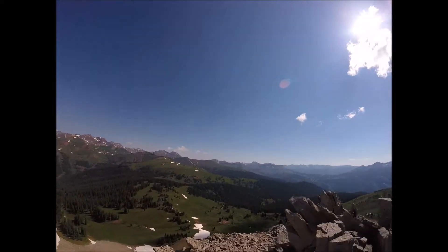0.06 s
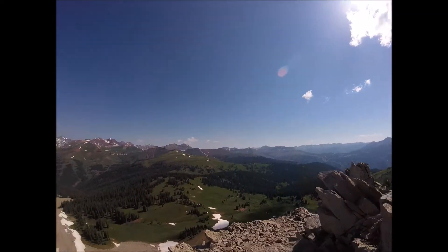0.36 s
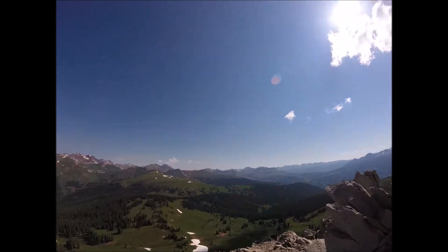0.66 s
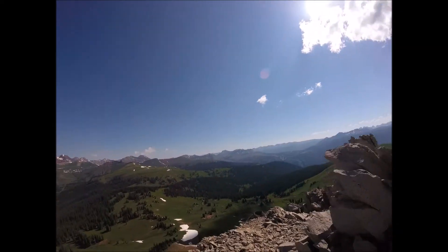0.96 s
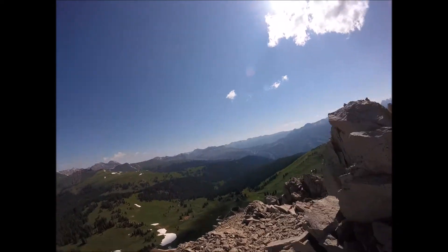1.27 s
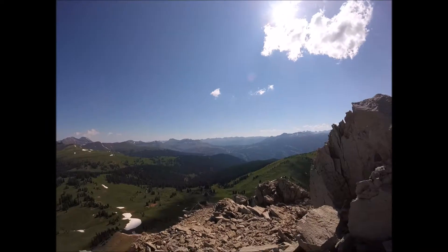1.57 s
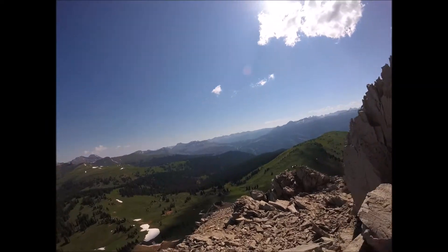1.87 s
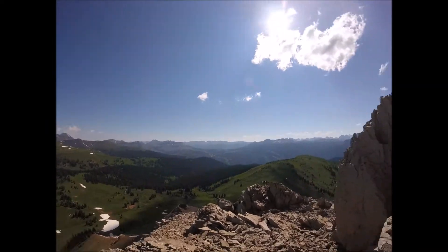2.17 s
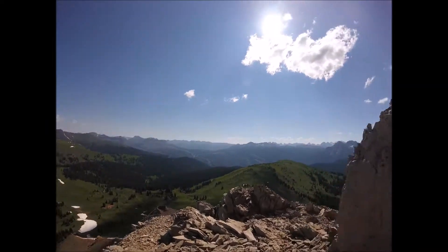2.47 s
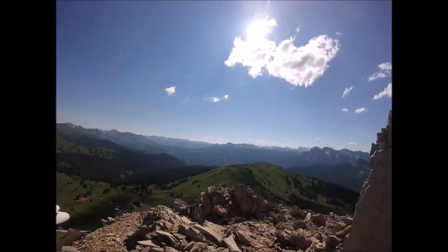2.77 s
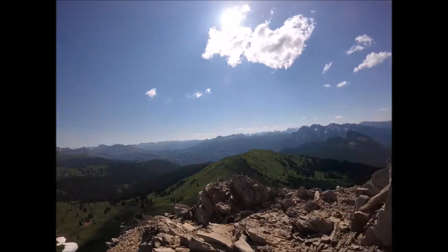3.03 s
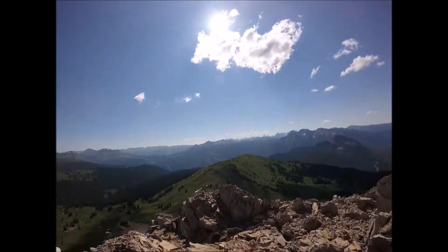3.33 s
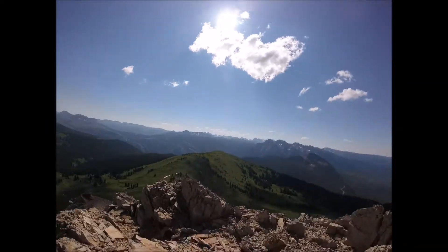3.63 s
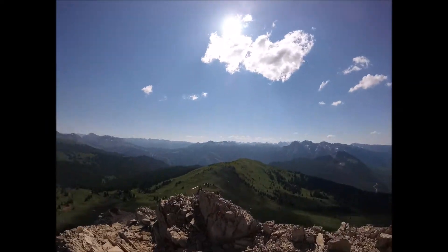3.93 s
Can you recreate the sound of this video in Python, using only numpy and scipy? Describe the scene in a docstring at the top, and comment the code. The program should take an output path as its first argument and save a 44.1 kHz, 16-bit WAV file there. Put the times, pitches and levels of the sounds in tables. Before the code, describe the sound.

Boots grind through gravel and knock flat stones together on a windy ridge. Gusts hit the close microphone through the first half, then ease, leaving the uneven steps, a low rumble and a few dull bumps.

```python
"""Wind buffets a body-worn camera's microphone as boots crunch over flat stones on a mountain ridge.
Each step grinds the loose gravel by friction, knocks stones together and sets thin shards ringing
in damped modes; scree keeps settling in between. The turbulent gusts then drop to a slow, deep
rumble, while footfalls and handling jolt the camera with soft thumps."""
import sys
import numpy as np
from scipy import signal
from scipy.fft import rfft, irfft, next_fast_len
from scipy.io import wavfile
from scipy.ndimage import uniform_filter1d, minimum_filter1d, map_coordinates

SR = 44100
rng = np.random.default_rng(int(sys.argv[2]) if len(sys.argv) > 2 else 0)


def transcribe(u):
    """Save the signal u as a 16-bit wav file named by the first command-line argument.

    u: samples, shape (n,) or (channels, n), limited to [-1, 1]; the rate is SR.
    q: integer samples, one column per channel.
    """
    v = np.clip(np.atleast_2d(u).T, -1, 1)
    q = np.round(v * 32767).astype(np.int16)
    wavfile.write(sys.argv[1], SR, q)


N = 176400

# spectrum of stone touching stone: (frequency [Hz], relative density [dB])
STONE_SPECTRUM = [(150, -35.5), (250, -7.5), (457, 2), (700, -2), (899, 1.5), (1300, 0.5), (2020, -2),
                  (3920, -10.5), (4410, -14.5), (5660, -18), (7710, -24), (8420, -31), (10900, -45),
                  (14000, -59.5), (18500, -120)]


def crunches():
    """Stick-slip friction: the boot's weight builds up, grinds the gravel in fits and lets go."""
    # (time [s], rise [s], hold [s], release t60 [s], level [dB], bass [dB], treble [dB])
    steps = [(0.326, 0.021, 0.0077, 0.087, -27.5, -5.5, 9), (0.365, 0.042, 0.022, 0.08, -40, -21, 4),
             (0.668, 0.026, 0.019, 0.087, -29, 7.5, 10.5), (0.777, 0.015, 0.012, 0.077, -32.5, 17.5, 10),
             (0.86, 0.0094, 0.009, 0.18, -30.5, 12, 6.5), (1.019, 0.022, 0.0081, 0.14, -22, 13.5, 11.5),
             (1.064, 0.023, 0.17, 0.3, -39, 19, 6.5), (1.361, 0.0089, 0.004, 0.11, -31, 12, 1),
             (1.653, 0.0036, 0.045, .1, -38, -1, 8.5), (1.979, 0.034, 0.026, 0.046, -34.5, -2.5, 5.5),
             (2.082, 0.023, 0.0099, 0.048, -32.5, 7, 6), (2.414, 0.0074, 0.062, 0.16, -44, 9.5, -2.5),
             (2.668, 0.024, 0.011, 0.1, -28.5, 1.5, 5), (2.782, 0.026, 0.016, 0.17, -37.5, 11, 1),
             (2.893, 0.0035, 0.024, 0.35, -41, -8, 10), (2.965, 0.029, 0.032, 0.16, -24, -0.5, 4.5),
             (3.038, 0.033, 0.0028, 0.055, -24.5, 1, 2), (3.351, 0.029, 0.016, 0.16, -24.5, -3, -5.5),
             (3.491, 0.0045, 0.025, 0.1, -39, 3, 12), (3.569, 0.01, 0.0063, 0.089, -31, -10, -10),
             (3.664, 0.0052, 0.033, 0.048, -38.5, -21, -31), (3.809, 0.019, 0.069, 0.043, -39, 4.5, -5)]
    clump_db, clumps_per_s = 2.2, 320
    out, t = np.zeros(N), np.arange(SR // 2) / SR
    for start, rise, hold, t60, db, bass_db, treble_db in steps:
        loading = np.minimum(t / rise, 1) ** 1.21
        release = amp(-60 * np.maximum(t - rise - hold, 0) / t60)
        grinding = shifting(gravel(len(t), bass_db, treble_db))
        fits = amp(clump_db * wobble(clumps_per_s, len(t)))
        add(out, start, amp(db) * loading * release * unit(grinding * fits))
    return out


def gravel(n, bass_db, treble_db):
    """Source and filter: contacts and grinding, coloured by the stones and the camera housing."""
    # resonances of the camera housing, which colour every crunch and knock:
    # (frequency [Hz], bandwidth [Hz], lift [dB])
    housing_modes = [(1287, 36, 4.5), (1530, 30, 5), (1777, 26, 7)]
    bass_hz, treble_hz, grinding_share = 707, 3230, 0.59

    def colour(hz):
        housing = sum(db / (1 + (2 * (hz - centre) / width) ** 2) for centre, width, db in housing_modes)
        bass = bass_db / (1 + (hz / bass_hz) ** 4)
        treble = treble_db * (1 - 1 / (1 + (hz / treble_hz) ** 4))
        return along(STONE_SPECTRUM, hz) + housing + bass + treble + ripple(hz)
    contacts = np.sqrt(1 - grinding_share) * grains(n, per_s=1500, spread_db=5)
    grinding = np.sqrt(grinding_share) * rng.standard_normal(n)
    return coloured(contacts + grinding, colour)


def ripple(hz, depth_db=3, step_hz=170):
    """Irregular modes give each stone its own uneven frequency response, in dB."""
    return depth_db * map_coordinates(rng.standard_normal(size=256), [hz / step_hz], mode="mirror")


def shifting(x, depth_db=2.4):
    """Time-varying filtering: brief resonances come and go as other stones take the load."""
    spectrogram = signal.stft(x, nperseg=256)[2]
    patches = uniform_filter1d(rng.standard_normal(spectrogram.shape), 4, axis=0)  # across frequency
    patches = uniform_filter1d(patches, 3, axis=1)  # across time
    shifted = signal.istft(spectrogram * amp(depth_db * unit(patches)))[1]
    return unit(shifted[:len(x)])


def knocks():
    """Impact excitation: a stone tips onto another with a dry, broadband clack."""
    # (time [s], level [dB], t60 [s], treble [dB])
    impacts = [(0.103, -24, 0.059, 2), (0.34, -32, 0.047, 23), (0.412, -31.5, 0.034, 5),
               (0.628, -35, 0.11, 5), (0.68, -29.5, 0.059, 8.5), (.761, -32, 0.073, 0.5),
               (0.794, -24, 0.022, -13), (1.015, -35, 0.056, 11), (1.139, -23, 0.038, 4),
               (1.196, -15.5, 0.051, 12), (1.342, -25.5, 0.038, 12), (1.354, -26, 0.086, 8),
               (1.552, -33, 0.042, -5.5), (1.66, -36, .05, 15), (1.69, -29.5, 0.073, 3),
               (1.843, -36.5, 0.046, -5), (2.084, -34.5, 0.074, 10), (2.686, -20.5, 0.052, 17),
               (2.768, -35.5, 0.031, 16), (2.804, -28, 0.04, -30), (2.905, -23.5, 0.026, -7),
               (2.985, -20, 0.023, 8), (3.005, -15, 0.032, 5), (3.018, -15.5, 0.03, 17),
               (3.063, -17.5, 0.041, 10), (3.378, -13, 0.037, 14.5), (3.668, -24, 0.055, -1),
               (3.673, -31.5, 0.033, 14.5), (3.724, -27, 0.045, -6), (3.747, -37.5, 0.085, 6),
               (3.783, -29, 0.11, -8), (3.845, -27, 0.084, 10.5), (3.932, -32, 0.021, 16),
               (3.965, -20.5, 0.058, -1)]
    out, t = np.zeros(N), np.arange(SR // 4) / SR
    for start, db, t60, treble_db in impacts:
        clack = gravel(len(t), bass_db=-1.6, treble_db=treble_db)
        add(out, start, amp(db) * struck(t, t60, attack_s=0.0013) * clack)
    return out


def clinks():
    """Free vibration: struck flat stones ring briefly at their natural frequencies."""
    # (time [s], frequency [Hz], level [dB], t60 [s])
    shards = [(0.338, 4460, -16.5, 0.024), (.63, 3560, -31.5, 0.029), (0.868, 1242, -24.5, 0.098),
              (1.015, 800, -8, 0.012), (1.661, 6330, -27.5, 0.019), (2.012, 2143, -14.5, 0.034),
              (2.011, 1744, -15.5, 0.03), (2.688, 7250, -28, 0.028), (2.701, 6460, -18, 0.017),
              (2.905, 6770, -33.5, 0.038), (2.973, 6950, -36.5, 0.07), (3.02, 1266, -18.5, 0.082),
              (3.379, 1310, -5, 0.031), (3.377, 1690, -21, 0.032), (3.379, 737, -20, 0.09),
              (3.583, 6420, -27.5, 0.024), (3.804, 6200, -39.5, 0.033), (3.819, 4900, -34, 0.016),
              (3.848, 3840, -29, 0.095), (3.844, 6550, -33.5, 0.029), (3.864, 5510, -26.5, 0.031),
              (3.894, 4660, -37, 0.033), (3.964, 1450, -15, 0.022)]
    out = np.zeros(N)
    for start, hz, db, t60 in shards:
        add(out, start, amp(db) * ring(hz, t60))
    return out


def ring(hz, t60, attack_cycles=1.6, roughness=0.3):
    """One damped mode of a stone, its phase disturbed by rattling on its neighbours."""
    t = np.arange(SR // 5) / SR
    rattle = uniform_filter1d(rng.standard_normal(len(t)), size=12)
    drift = roughness * np.cumsum(rattle) / np.sqrt(SR / 1000)
    attack = (1 - np.exp(-t * hz / attack_cycles)) ** 2
    return np.sin(2 * np.pi * hz * t + drift) * attack * amp(-60 * t / t60)


def scree():
    """Granular flow: disturbed gravel trickles in clumps; chips stand out more when much of it moves."""
    # (time [s], relative level [dB])
    activity = [(0, -43), (.2, -44.5), (.3, -55.5), (.42, -35.5), (.52, -47), (.75, -44), (.95, -46.5),
                (1, -56), (1.2, -48), (1.32, -48), (1.42, -43), (1.62, -52.5), (1.72, -40.5), (1.84, -49.5),
                (1.9, -42), (2.02, -44), (2.36, -54), (2.65, -50.5), (2.73, -42.5), (2.87, -41),
                (3.18, -36.5), (3.34, -49.5), (3.43, -47.5), (3.52, -40), (3.63, -44), (4, -40.5)]
    # (frequency [Hz], relative density [dB])
    trickle_spectrum = [(180, -59.5), (300, -21), (437, -7), (600, -11.5), (1390, -9), (4560, -28.5),
                        (7120, -33), (8420, -45.5), (10900, -60), (18500, -120)]
    level_db = curve(activity)
    contacts = grains(N, per_s=2800, spread_db=0)
    trickle = coloured(contacts, lambda hz: along(trickle_spectrum, hz)) * amp(3.5 * wobble(70))
    chips = chip_ticks(count=130, centre_hz=3100, spread_octaves=0.65, spread_db=2.1, t60=0.04)
    chips_db = -11.5 + 0.19 * (level_db - level_db.max())
    return amp(level_db) * (amp(-5.5) * trickle + amp(chips_db) * chips)


def chip_ticks(count, centre_hz, spread_octaves, spread_db, t60):
    """Random impacts: each small chip ticks in its own resonant band; rms 1 overall."""
    out, t = np.zeros(N), np.arange(SR // 16) / SR
    envelope = struck(t, t60, attack_s=0.0016)
    starts = rng.random(count) * N / SR
    for start, (pitch, size) in zip(starts, np.clip(rng.standard_normal((count, 2)), -2, 2)):
        def band(hz):
            octaves_off = np.log2((hz + 1) / centre_hz) - spread_octaves * pitch
            return along(STONE_SPECTRUM, hz) - 9 * octaves_off ** 2 + ripple(hz)
        add(out, start, amp(spread_db * size) * envelope * coloured(rng.standard_normal(len(t)), band))
    return unit(out)


def wind():
    """Turbulence: gusts buffet the microphone over a faint hiss; strong ones shed brighter eddies."""
    # (time [s], relative level [dB])
    gusts = [(0, -25.5), (.3, -32.5), (.6, -28), (1.1, -31), (1.3, -34), (1.7, -39.5), (2.3, -49),
             (2.7, -42), (4, -43.5)]
    # sudden blasts: (centre time [s], duration [s], lift [dB], extra eddy level [dB])
    blasts = [(0.182, 0.036, 11.5, 3.5), (0.271, 0.041, 13.5, -1.5), (0.351, 0.029, 8, 10),
              (0.481, 0.16, 9.5, -1.5), (0.685, 0.11, 4, 3.5), (0.822, 0.17, 9.5, 0), (1.037, 0.038, 10, 1),
              (1.142, 0.18, 11, 5.5), (1.359, 0.068, 10, 6), (1.521, 0.12, 8.5, 3),
              (1.64, 0.032, 11.5, 6.5), (1.783, 0.015, 12.5, 7.5)]
    # buffeting, eddies and airy hiss, each: (frequency [Hz], relative density [dB])
    buffet_spectrum = [(30, -16), (60, 0), (105, 1.5), (200, -9), (300, -19), (500, -45.5), (1000, -60),
                       (8000, -120)]
    eddy_spectrum = [(100, -16), (220, 3), (350, -2), (600, -12.5), (1200, -40), (12000, -100)]
    hiss_spectrum = [(400, -6), (1500, -16), (4000, -16), (8000, -6.5), (12500, -14.5), (15000, -46)]
    strong_db, eddy_growth = -24, 1.14
    t = np.arange(N) / SR
    gust_db, eddy_db = curve(gusts), -36.5
    for centre, duration, lift_db, extra_db in blasts:
        blast = 1 / (1 + (2 * (t - centre) / duration) ** 4)
        gust_db += lift_db * blast
        eddy_db += extra_db * blast
    buffet = amp(gust_db + 3) * even_noise(buffet_spectrum)
    flutter = unit(noise(eddy_spectrum) * amp(2.5 * wobble(55)))
    eddies = amp(eddy_db + eddy_growth * (gust_db - strong_db)) * flutter
    return buffet + eddies + amp(-68.5) * noise(hiss_spectrum)


def rumble():
    """Low-frequency pressure fluctuation: slow air and the moving camera swing it to and fro."""
    # strength of the slow swings: (time [s], level [dB])
    sway_levels = [(0, -16), (1, -14.5), (1.6, -9.5), (2.2, -15.5), (4, -12)]
    # slow swings and steady rumble, each: (frequency [Hz], relative density [dB])
    sway_spectrum = [(2, -10), (11, -3.5), (16, 2), (24, -16), (40, -54), (150, -140)]
    rumble_spectrum = [(12, -8), (24, 14.5), (40, -5.5), (60, -4), (90, -13.5), (150, -32.5), (1500, -120)]
    return amp(curve(sway_levels)) * even_noise(sway_spectrum) + amp(-18) * noise(rumble_spectrum)


def thumps(width_cycles=0.65):
    """Structure-borne sound: footfalls and handling jolt the camera with short, low wave packets."""
    # (centre time [s], frequency [Hz], level [dB])
    jolts = [(2.001, 194, -27.5), (2.031, 97, -15), (2.092, 162, -22.5), (2.503, 31.7, -17.5),
             (2.722, 101, -20.5), (2.771, 35, -9.5), (3.021, 34, -8.5), (3.38, 108, -25),
             (3.388, 39.5, -4.5), (3.634, 127, -22), (3.668, 127, -22), (3.786, 41, -1)]
    out, t = np.zeros(N), np.arange(N) / SR
    for centre, hz, db in jolts:
        cycles = hz * (t - centre)
        envelope = np.exp(-(cycles / width_cycles) ** 2)
        out += amp(db) * envelope * np.sin(2 * np.pi * (cycles + rng.random()))
    return out


def struck(t, t60, attack_s):
    """Impact envelope: a fast rise, then exponential damping by 60 dB in t60 seconds."""
    return (1 - np.exp(-t / attack_s)) * amp(-60 * t / t60)


def grains(n, per_s, spread_db):
    """Shot noise: tiny random contacts of scattered size, at rms 1."""
    hits = rng.random(n) < per_s / SR
    polarity = np.sign(rng.standard_normal(n))
    sizes = amp(spread_db * np.clip(rng.standard_normal(n), -2, 2))
    return unit(hits * polarity * sizes)


def even_noise(spectrum):
    """Envelope compression: noise whose swings reach a similar height, at rms 1."""
    swing = signal.hilbert(noise(spectrum))
    return unit(swing.real / np.sqrt(np.abs(swing) ** 2 + 1))


def noise(spectrum):
    """Gaussian noise with the given spectrum, at rms 1."""
    return coloured(rng.standard_normal(N), lambda hz: along(spectrum, hz))


def coloured(x, db_of_hz):
    """Linear filtering of x by a gain curve in dB, at rms 1."""
    gain = amp(db_of_hz(np.fft.rfftfreq(len(x), 1 / SR)))
    return unit(irfft(rfft(x) * gain, len(x)))


def wobble(knots_per_s, n=N):
    """Smooth random modulation: a spline through Gaussian knots."""
    return map_coordinates(rng.standard_normal(size=1024), [np.arange(n) * knots_per_s / SR],
                           mode="mirror")


def along(points, hz):
    """Interpolation of (frequency [Hz], level [dB]) points on a log frequency axis."""
    frequencies, levels = np.transpose(points)
    return np.interp(np.log(hz + 1), np.log(frequencies + 1), levels)


def curve(points):
    """Interpolation of (time [s], level [dB]) points at every sample."""
    return np.interp(np.arange(N) / SR, *np.transpose(points))


def amp(db):
    """Amplitude ratio of a level in decibels."""
    return 10 ** (np.asarray(db) / 20)


def unit(x):
    """Normalisation to rms 1."""
    return x / np.sqrt(np.mean(x ** 2) + 1e-20)


def add(track, start_s, x):
    """Superposition of x on the track from start_s on."""
    i = int(np.clip(round(start_s * SR), 0, N - 1))
    track[i:i + len(x)] += x[:N - i]


def scene():
    """Superposition: stones, wind and jolts sum at one microphone."""
    return (crunches() + knocks() + clinks() + scree() + wind() + rumble() + thumps())[None]


def record(dry):
    """Look-ahead limiting and a low-pass filter: the camera holds peaks down and cuts the top treble."""
    ceiling, window, top_hz = 0.72, 1200, 15700
    needed_gain = np.minimum(1, ceiling / (np.abs(dry) + 1e-9))
    held_gain = minimum_filter1d(needed_gain, window)
    smooth_gain = uniform_filter1d(uniform_filter1d(held_gain, window // 2), window // 2)
    padded = next_fast_len(N + SR // 2)
    passband = np.fft.rfftfreq(padded, 1 / SR) < top_hz
    return irfft(rfft(dry * smooth_gain, padded) * passband, padded)[..., :N]


dry = scene()
out = record(dry)
transcribe(out)
```